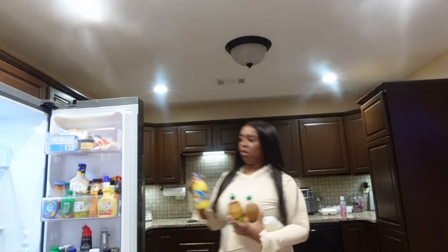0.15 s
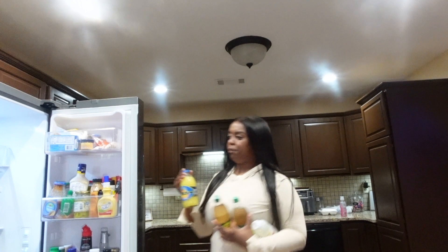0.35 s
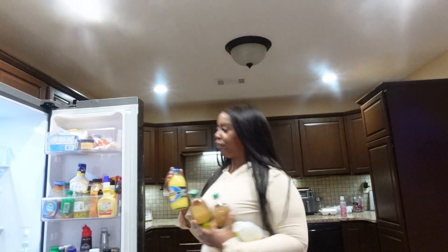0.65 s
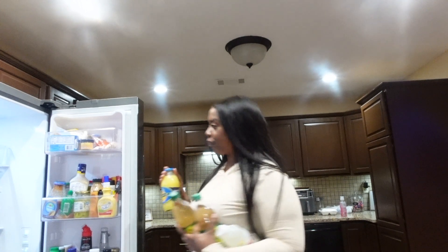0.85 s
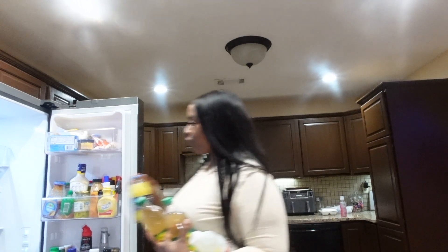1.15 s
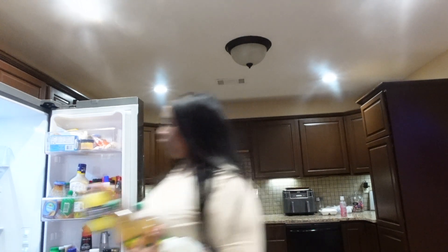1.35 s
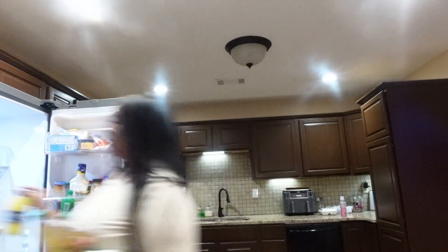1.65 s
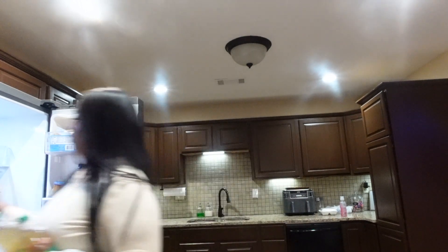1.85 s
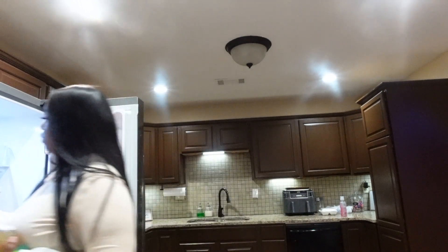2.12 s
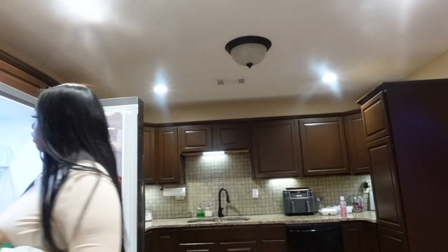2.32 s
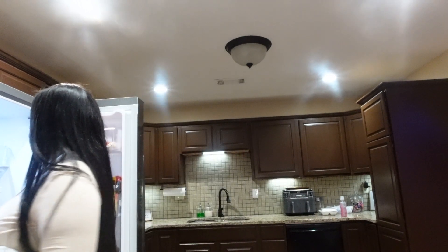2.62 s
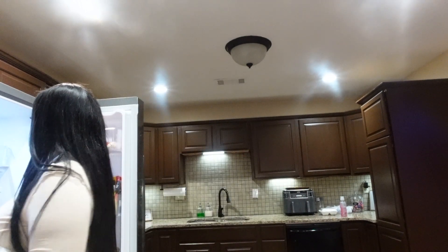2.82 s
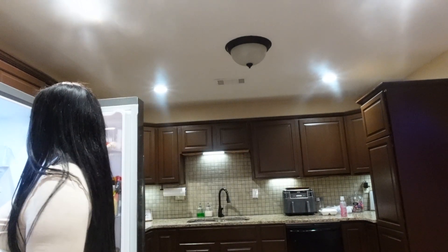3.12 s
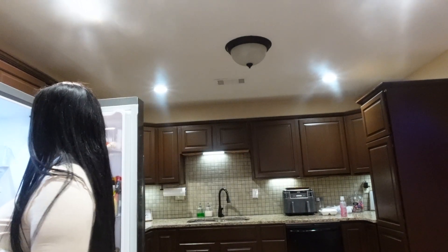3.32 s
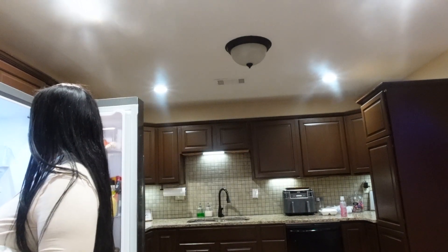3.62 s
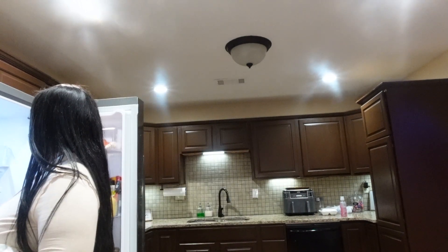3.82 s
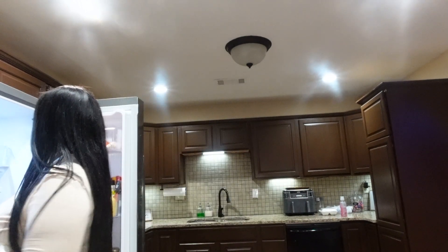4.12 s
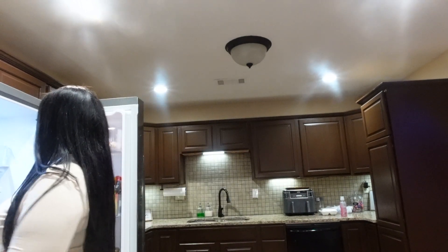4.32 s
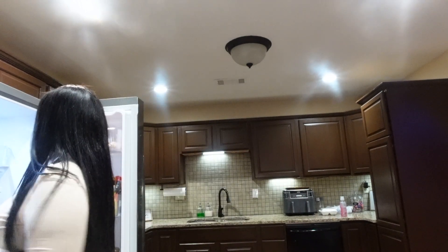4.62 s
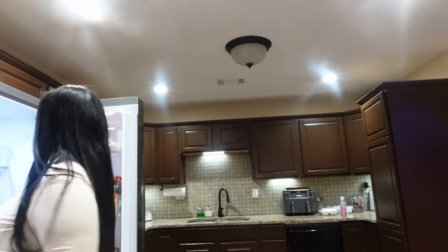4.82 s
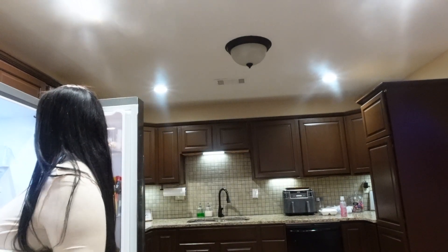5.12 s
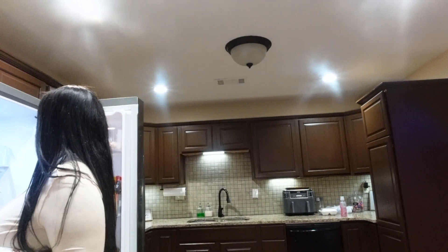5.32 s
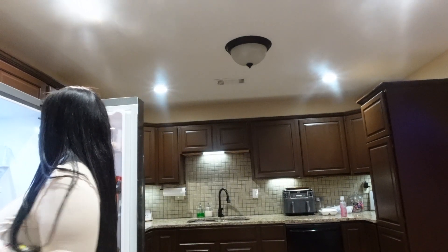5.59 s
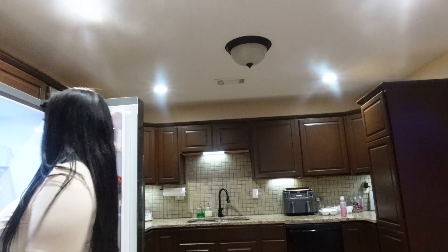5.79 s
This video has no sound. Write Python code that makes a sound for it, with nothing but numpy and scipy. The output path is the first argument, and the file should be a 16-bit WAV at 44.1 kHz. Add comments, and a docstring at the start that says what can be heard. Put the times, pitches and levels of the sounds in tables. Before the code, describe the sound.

Slippers slap, scuff and give a small squeak as someone crosses a hard kitchen floor. Full bottles then knock onto refrigerator shelves in a few separate clusters, each with a brief rattle, a short ring and a low thump from the cabinet. A sleeve brushes faintly and plastic ticks between them. The compressor and fan hum softly throughout, and the hard walls add a short echo, with everything slightly left of the microphone.

```python
"""Slippers shuffle across an echoing kitchen, then full bottles knock down onto refrigerator shelves.
The soles slap, rub and squeak on the hard floor, and a sleeve brushes faintly.
Each bottle rattles the shelf and plastic liner, sets the shelf ringing and thumps the cabinet.
Behind it all the compressor hums and the fan rushes; hard walls make the steps and knocks echo."""
import sys
import numpy as np
from scipy import signal
from scipy.fft import rfft, irfft
from scipy.io import wavfile

SR = 44100
rng = np.random.default_rng(int(sys.argv[2]) if len(sys.argv) > 2 else 0)


def dump_mix(stems):
    """Bounce the given channels to the path in sys.argv[1] as a 16-bit WAV at rate SR."""
    frames = np.atleast_2d(stems).T  # one column per channel
    limited = np.clip(frames, -1, 1)  # hard clip at full scale
    pcm = np.round(limited * 32767).astype(np.int16)
    wavfile.write(sys.argv[1], SR, pcm)


N = 262395
TIME = np.arange(N) / SR
BAND_EDGES = np.geomspace(28, 17500, 25)   # 24 frequency bands, bass to treble [Hz]
BAND_CENTRES = np.sqrt(BAND_EDGES[1:] * BAND_EDGES[:-1])
BAND_FILTERS = [signal.butter(2, pair, "band", fs=SR, output="sos")
                for pair in zip(BAND_EDGES, BAND_EDGES[1:])]

# how long the room takes to fade by 60 dB: (frequency [Hz], time [s])
ROOM_FADE = [(100, 0.84), (260, 0.69), (700, 0.7), (1840, 0.65), (4850, 0.66), (8000, 0.6), (13000, 0.63)]
# tone of the room's echo: (frequency [Hz], level [dB])
ROOM_TONE = [(100, -0.5), (1000, 0.5), (4000, -3.5), (8000, -2), (15000, -3)]
# fine hiss of a rubbing sole or sleeve: (frequency [Hz], level [dB])
RUB_HISS = [(100, -47.5), (2000, -22.5), (5000, -3), (9000, -6), (15000, -15.5)]
# bottles meeting a shelf; thump and ring are added to the level:
# (time [s], level [dB], thump [dB], brightness [dB per octave], rattle decay [s], shelf ring [dB])
KNOCKS = [(2.167, -9.5, -16, 0, 0.02, -22), (2.202, -13.5, -5, -0.5, .008, 8),
          (2.26, -13.5, -26, -7, 0.0045, 0), (2.3148, -7.5, -8.5, -0.76, 0.0046, -1),
          (3.408, -63, 2, 8.5, .03, -17), (3.428, -30, -1, -4.5, 0.017, -18),
          (3.437, -16.5, 8, 1, 0.011, -14), (3.447, -18, -0.5, -4.5, 0.0094, -13),
          (3.660, -36.5, 11.5, -4, 0.02, -8), (3.708, -35.5, -6, -5.5, 0.0078, -4.5),
          (4.958, -38, -2.5, -8.5, 0.016, -11), (4.973, -41, 22, -2.5, .02, -15),
          (4.9919, -20.5, 7.5, -1.5, 0.016, 1.5), (5.240, -43.5, 6, -3, .007, -8)]


def from_db(db):
    """Turn decibels into a number to multiply by."""
    return 10 ** (np.asarray(db) / 20)


def unit_power(x):
    """Scale a sound so that its average power is 1."""
    return x / np.sqrt(np.mean(x ** 2) + 1e-20)


def lowpass(x, hz, order=2):
    """Soften everything above a frequency."""
    return signal.sosfilt(signal.butter(order, hz, fs=SR, output="sos"), x)


def add(track, s, sound):
    """Mix a sound into a track, starting at s seconds."""
    start = round(s * SR)
    track[start:start + len(sound)] += sound[:N - start]


def per_band(points):
    """Read a (frequency, value) table at the centre of each band, one row per band."""
    hz, value = np.transpose(points)
    return np.interp(np.log(BAND_CENTRES), np.log(hz), value)[:, None]


def band_noise(size):
    """White noise split into one row per band; neighbouring bands are unrelated."""
    white = rng.standard_normal((2, size + SR // 4))
    return np.array([signal.sosfilt(sos, white[k % 2])[-size:] for k, sos in enumerate(BAND_FILTERS)])


def shaped_noise(tone):
    """Steady noise whose tone follows a (frequency, level) table."""
    hz, db = np.transpose(tone)
    bins_hz = np.arange(1, N // 2 + 2) * SR / N
    gains = from_db(np.interp(np.log(bins_hz), np.log(hz), db))
    return unit_power(irfft(rfft(rng.standard_normal(N)) * gains, N))


def stereo_noise(gains, size, wider_db=0):
    """Noise from all around: nearly alike in both ears in the bass, wider in the treble."""
    # stereo width: (frequency [Hz], side level compared with mid [dB])
    width = [(60, -17), (250, -15), (600, -13), (2000, -11.5), (6000, -10), (14000, -13)]
    mid = (band_noise(size) * gains).sum(0)
    side = (band_noise(size) * gains * from_db(per_band(width) + wider_db)).sum(0)
    return np.array([mid + side, mid - side])


def stroke(s, rise_s, fall_db_per_s, hold_s=0, sag_db_per_s=0, rise_db=29.5):
    """Loudness of one rub: it swells up to time s, sags while held, then falls away."""
    t = TIME - s
    swell_db = rise_db * np.minimum(t, 0) / rise_s
    sag_db = sag_db_per_s * np.clip(t, 0, hold_s)
    fall_db = fall_db_per_s * np.maximum(t - hold_s, 0)
    return from_db(swell_db - sag_db - fall_db) + 1e-9


def ping(hz, width_hz):
    """A click that rings at one pitch; a greater width makes it die sooner."""
    r = np.exp(-np.pi * width_hz / SR)
    feedback = [1, -2 * r * np.cos(2 * np.pi * hz / SR), r * r]
    wave = signal.lfilter([1, 0, -1], feedback, signal.unit_impulse(SR // 50))
    return wave / np.abs(wave).max()


def snaps(events, tones, room_db):
    """A stiff surface rings briefly at each hit. Returns (direct sound, sound sent to the room)."""
    # bounces off floor and cupboards: (delay [s], level [dB])
    echoes = [(.0054, -4), (.0137, -13), (.0305, -9)]
    out = np.zeros(N)
    snap = sum(from_db(db) * ping(hz, width_hz) for hz, width_hz, db in tones)
    for s, level_db in events:
        for delay, db in [(0.00097, 0.00089)] + echoes:   # the straight path comes first
            add(out, s + delay, from_db(level_db + db) * snap)
    out = lowpass(out + 1e-18, 8000)
    return np.array([out, from_db(room_db) * out])


def struck(tones, blows, swell_s, spread_db=4.0):
    """Each blow (time, level) sets an object's own tones ringing, each at a slightly random strength."""
    out, t = np.zeros(N), TIME[:SR]
    hz, tone_db, fade_s = np.transpose(tones)[:, :, None]
    fade = np.exp(-np.log(1000) * t / fade_s) * (1 - np.exp(-t / swell_s))
    for s, blow_db in blows:
        strength = from_db(blow_db + tone_db + spread_db * rng.standard_normal(hz.shape))
        waves = np.sin(2 * np.pi * (hz * t + rng.random(hz.shape)))
        add(out, s, (strength * fade * waves).sum(0))
    return out


def compressor_and_fan(air_db=-57.5):
    """The compressor hums steadily over the soft rush of the fan."""
    # compressor tones: (frequency [Hz], level [dB])
    hum_tones = [(118.6, -61.5), (237.2, -72.5), (355.8, -75)]
    # fan and room air: (frequency [Hz], level [dB])
    air_tone = [(30, -27.5), (50, -10), (80, -15.5), (150, -5), (210, -0.5), (310, -7), (450, -12),
                (1000, -15.5), (2000, -18.5), (4000, -24), (6300, -24.5), (9000, -25), (15500, -26.5)]
    hum = sum(from_db(db) * np.sqrt(2) * np.sin(2 * np.pi * (hz * TIME + rng.random()))
              for hz, db in hum_tones)
    air = unit_power(stereo_noise(from_db(per_band(air_tone)), N, wider_db=5.5))
    return hum + from_db(air_db) * air


def reflections(x, build_s=0.0026):
    """Tiles and cupboards bounce sound back like mirrors, so it keeps its tone as it fades."""
    t = TIME[:SR]
    rate = np.log(1000) / per_band(ROOM_FADE)
    fade = np.sqrt(2 * rate / SR) * np.exp(-rate * t) * (1 - np.exp(-t / build_s))
    echo = stereo_noise(fade * from_db(per_band(ROOM_TONE)), len(t))
    return signal.fftconvolve(x[None], echo, axes=1)[:, :N]


def scatter(x, build_s=0.0013):
    """Scattered sound blurs into noise that builds up and dies away, sooner in the treble."""
    build = np.exp(-1 / (build_s * SR))
    keeps = from_db(-120 / (per_band(ROOM_FADE)[:, 0] * SR))   # share of energy left after one sample
    energy = []
    for sos, keep, width_hz in zip(BAND_FILTERS, keeps, np.diff(BAND_EDGES)):
        power = signal.sosfilt(sos, x) ** 2 * SR / 2 / width_hz
        energy.append(signal.lfilter([(1 - keep) * (1 - build)], [1, -keep - build, keep * build], power))
    return stereo_noise(np.sqrt(np.abs(energy)) * from_db(per_band(ROOM_TONE)), N)


def kitchen_echo(x, mirrored=0.44):
    """Hard surfaces mirror one share of the echo's energy and scatter the rest."""
    return np.sqrt(mirrored) * reflections(x) + np.sqrt(1 - mirrored) * scatter(x)


def sleeve():
    """Cloth gives a faint, slow swell of hiss with each reach."""
    # a sleeve brushes past: (time [s], level [dB])
    brushes = [(1.299, -72), (2.85, -73), (3.82, -73), (4.09, -79), (4.64, -72), (4.95, -70.5),
               (5.3, -76.5), (5.9, -72)]
    swells = sum(from_db(db) * stroke(s, rise_s=0.32, fall_db_per_s=54) for s, db in brushes)
    return swells * shaped_noise(RUB_HISS)


def plastic_ticks():
    """Plastic ticks lightly as it is touched."""
    # touches: (time [s], level [dB])
    ticks = [(4.3705, -50), (4.3745, -43), (4.377, -44)]
    # the plastic's tones: (frequency [Hz], width [Hz], level [dB])
    tick_tones = [(2790, 230, -8.5), (4500, 940, -2), (6640, 2100, 4)]
    return snaps(ticks, tick_tones, room_db=1.5)


def footsteps():
    """A slipper slaps the hard floor, and softer steps follow."""
    # the sole touches, then slaps: (time [s], level [dB])
    slaps = [(.2935, -31), (.2962, -9.5)]
    # tones of a slap: (frequency [Hz], width [Hz], level [dB])
    slap_tones = [(516, 520, -15), (2670, 480, -3.5), (3530, 540, -2.5)]
    # soft steps: (time [s], level [dB])
    taps = [(.776, -44), (1.497, -38), (1.511, -37), (1.596, -32)]
    # tones of a soft step: (frequency [Hz], width [Hz], level [dB])
    tap_tones = [(516.6, 600, -11), (1550, 772, 2)]
    return snaps(slaps, slap_tones, room_db=6.5) + snaps(taps, tap_tones, room_db=1.5)


def sole_squeak(pitch_hz=1270, waver_hz=115):
    """A sole sticks and slips unevenly, which gives a hoarse chirp."""
    # the sole catches: (time [s], level [dB])
    catches = [(1.763, -41.5), (1.79, -36), (1.836, -39)]
    grip = sum(from_db(db) * stroke(s, rise_s=0.034, fall_db_per_s=800.5) for s, db in catches)
    waver = lowpass(rng.standard_normal((2, N)), waver_hz)
    phase = 2 * np.pi * pitch_hz * TIME
    return grip * unit_power(waver[0] * np.sin(phase) + waver[1] * np.cos(phase))


def sliding_soles(grit_db=3.0, grains_per_s=500):
    """Rubbing noise, made uneven by grit, sags as the foot slows and drops as it lifts."""
    # slides: (time of full pressure [s], level [dB], added to level for hiss [dB], press [s], slide [s])
    scuffs = [(0, -42, -10, .004, .002), (0.302, -34, -10, 0.0062, 0.044), (0.771, -37, -6.5, .06, .006),
              (.85, -40.5, -23, 0.1, 0.051), (1.598, -53.5, 0, 0.19, .02), (1.80, -46, -20, 0.17, 0.052),
              (1.917, -35.5, -20.5, 0.074, .11)]
    # tone of a rubbing sole: (frequency [Hz], level [dB])
    sole_tone = [(100, -41), (430, -35), (560, -17.5), (750, -9.5), (1100, -4.5), (2400, 3), (4200, 0.5),
                 (6500, -6), (9000, -16.5), (15000, -29.5)]
    rub, hiss = 0, 0
    for s, level_db, hiss_db, press_s, slide_s in scuffs:
        push = from_db(level_db) * stroke(s, press_s, fall_db_per_s=223, hold_s=slide_s, sag_db_per_s=32)
        rub += push
        hiss += from_db(hiss_db) * push
    grit = np.interp(TIME * grains_per_s, np.arange(N), rng.standard_normal(N))
    return from_db(grit_db * grit) * (rub * shaped_noise(sole_tone) + hiss * shaped_noise(RUB_HISS))


def shelf_and_cabinet_ring():
    """Each knock sets the shelf ringing quickly; the cabinet takes longer to get moving."""
    # the loaded shelf: (frequency [Hz], level [dB], time to fade by 60 dB [s])
    shelf_tones = [(323.4, -16, 0.35), (347, -27.5, 0.19), (408, -19, 0.23), (629, -29.5, 0.428),
                   (983, -33, 0.52), (1110, -29, 0.44), (1212, -29, 0.401), (1597, -26, .4),
                   (1800, -28, 0.37), (1920, -26, 0.41), (1977, -22, 0.25), (2100, -33, .45),
                   (2130, -28.5, 0.21), (2816, -25.5, 0.48), (3090, -32, 0.72), (3120, -28, 0.27),
                   (4573, -50, 0.36)]
    # boom of the refrigerator's body: (frequency [Hz], level [dB], time to fade by 60 dB [s])
    cabinet_tones = [(76.9, -36.5, 0.37), (106, -21.5, 0.37), (136.7, -28, .35), (195, -25, 0.5),
                     (286, -26, 0.7)]
    s, level_db, thump_db, *_, ring_db = np.transpose(KNOCKS)
    ring = struck(shelf_tones, zip(s, level_db + ring_db), swell_s=0.0052)
    boom = struck(cabinet_tones, zip(s, level_db + thump_db), swell_s=0.015)
    return ring + boom


def bottle_clacks(width_hz=150):
    """A bottle's wall clacks at one pitch as it lands."""
    # landings: (time [s], level [dB], pitch [Hz])
    clacks = [(2.182, -7.5, 1260), (2.3148, -7, 1600), (3.452, -15, 1780)]
    return sum(snaps([(s, db)], [(hz, width_hz, 0)], room_db=-6.5) for s, db, hz in clacks)


def bottle_knocks(thump_hz=210, pivot_hz=1000, bass_stretch=0.13, bass_wait_s=0.0091, grit_db=3):
    """Shelf and liner give a brief, gritty rattle; the heavy cabinet answers later and for longer."""
    # tone of a knock: (frequency [Hz], level [dB])
    knock_tone = [(45, -48), (70, -26.5), (115, -10), (200, 0), (340, -1.5), (490, -5), (800, -1.5),
                  (1400, -0.5), (2200, -1), (3200, -2), (5500, -7.5), (8000, -16.5), (12000, -24.5),
                  (16000, -33.5)]
    out, t = np.zeros(N), TIME[:SR // 5]
    hz = BAND_CENTRES[:, None]
    cabinet = 1 / (1 + (hz / thump_hz) ** 4)   # share of each band that comes from the cabinet
    age = np.maximum(t - bass_wait_s * cabinet, 0) / (1 + bass_stretch * pivot_hz / (hz + thump_hz))
    rise = 1 - np.exp(-age / 0.0031)
    octaves = np.log2(np.maximum(hz / pivot_hz, 0.5))
    energy_share = np.diff(BAND_EDGES)[:, None] * from_db(per_band(knock_tone)) ** 2
    energy_share /= energy_share.sum()
    for s, level_db, thump_db, brightness, decay_s, _ in KNOCKS:
        chatter = np.interp(t * 1000, np.arange(len(t)), rng.standard_normal(len(t)))   # 1000 a second
        roughness = from_db(grit_db * chatter * hz / (hz + pivot_hz))   # strongest in the treble
        rattle = band_noise(len(t)) * rise * np.exp(-age / decay_s) * roughness
        rattle *= np.sqrt(energy_share * decay_s * SR / 2 / (rattle ** 2).sum(1, keepdims=True))
        gains = from_db(level_db + thump_db * cabinet + brightness * octaves)
        add(out, s, (rattle * gains).sum(0))
    return out


def scene(left_db=0.48, knock_room_db=3, slide_room_db=8):
    """All in one room, a little to the left; the shuffling is heard mostly by way of the walls."""
    knocks = bottle_knocks()
    sliding = sliding_soles() + sleeve()
    squeak = sole_squeak()
    clicks, clicks_to_room = footsteps() + bottle_clacks() + plastic_ticks()
    dulled = lowpass(knocks, 6500, order=1)   # the open door keeps treble from the room
    to_room = from_db(knock_room_db) * dulled + from_db(slide_room_db) * sliding + squeak + clicks_to_room
    room = kitchen_echo(to_room)
    direct = knocks + shelf_and_cabinet_ring() + sliding + clicks + squeak
    return (direct + room + compressor_and_fan()) * from_db([[left_db], [-left_db]])


def record(dry, low_cut_hz=57, high_cut_hz=15900):
    """The microphone drops the deep bass, rounds the peaks and cuts the highest treble."""
    thin = signal.sosfilt(signal.butter(4, low_cut_hz, "high", fs=SR, output="sos"), dry)
    rounded = 0.8 * np.tanh(thin / 0.8)
    return signal.sosfilt(signal.ellip(10, 0.1, 80, high_cut_hz, fs=SR, output="sos"), rounded)


dry = scene()
out = record(dry)
dump_mix(out)
```